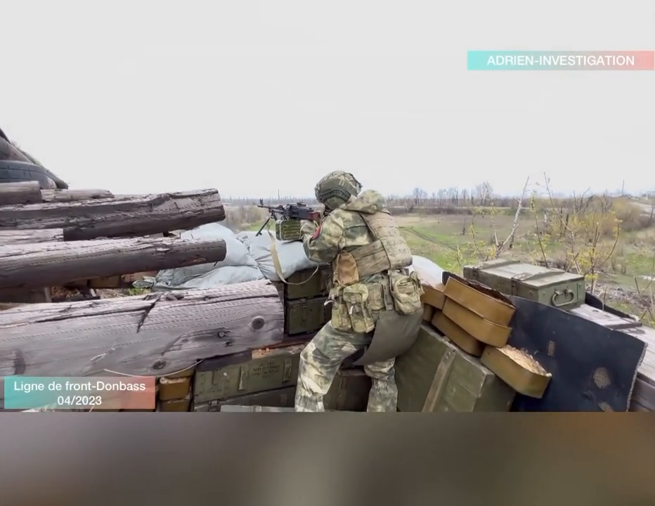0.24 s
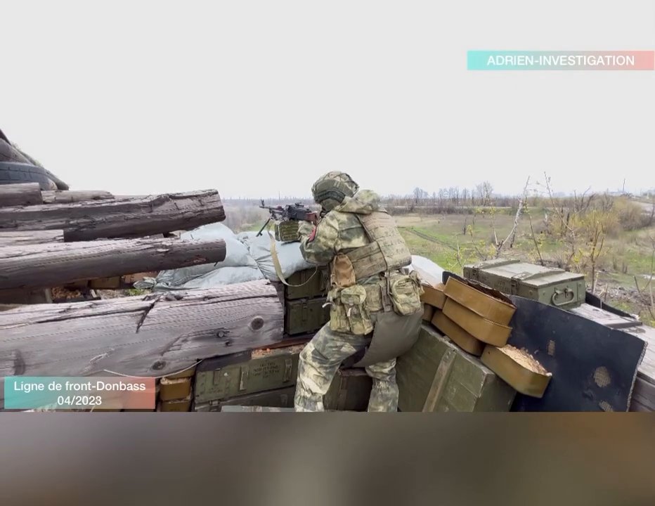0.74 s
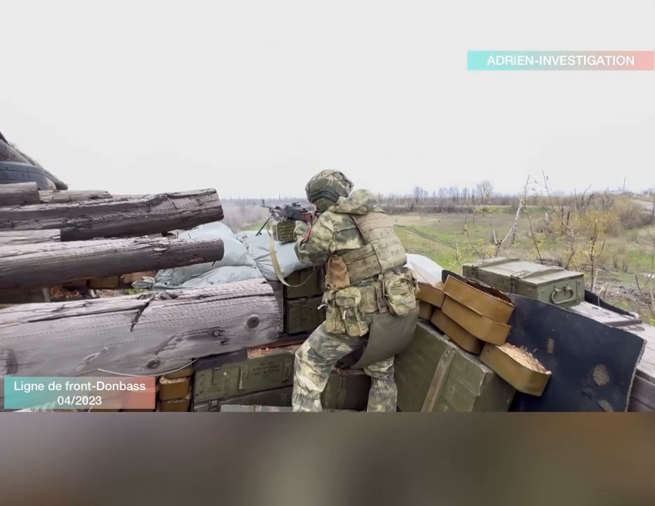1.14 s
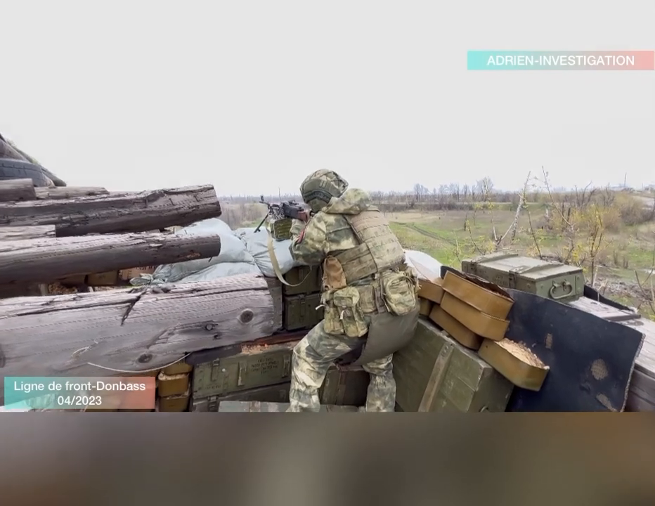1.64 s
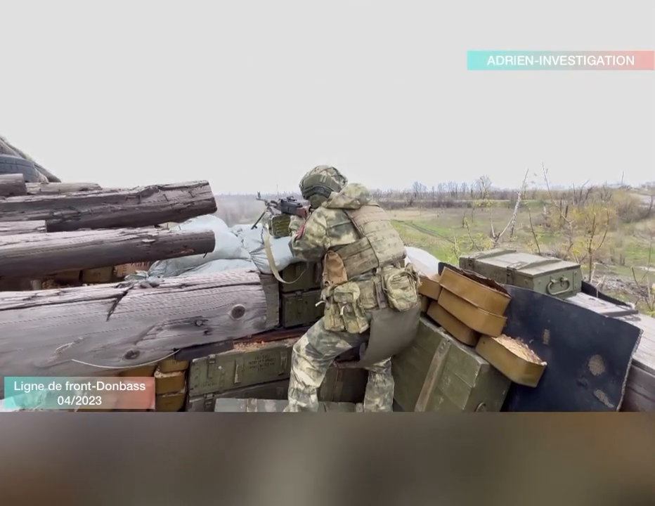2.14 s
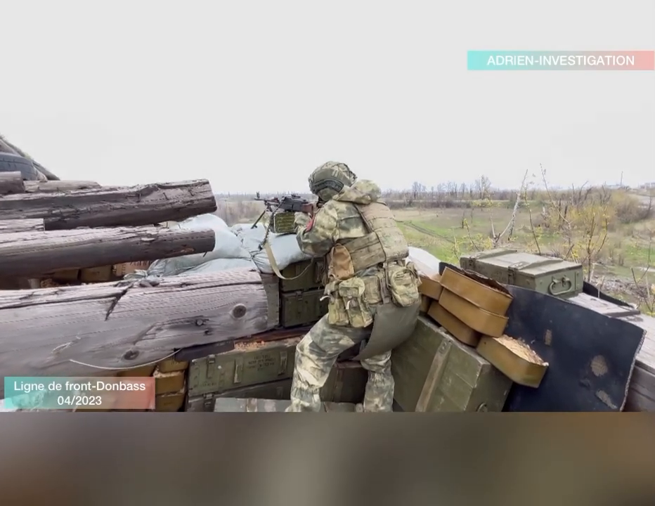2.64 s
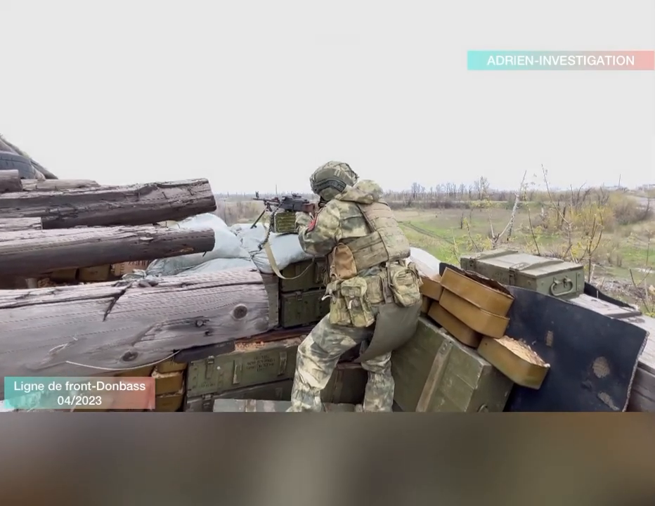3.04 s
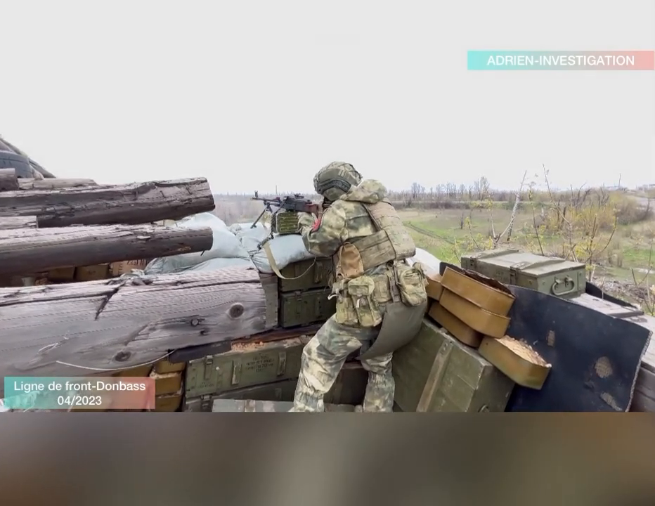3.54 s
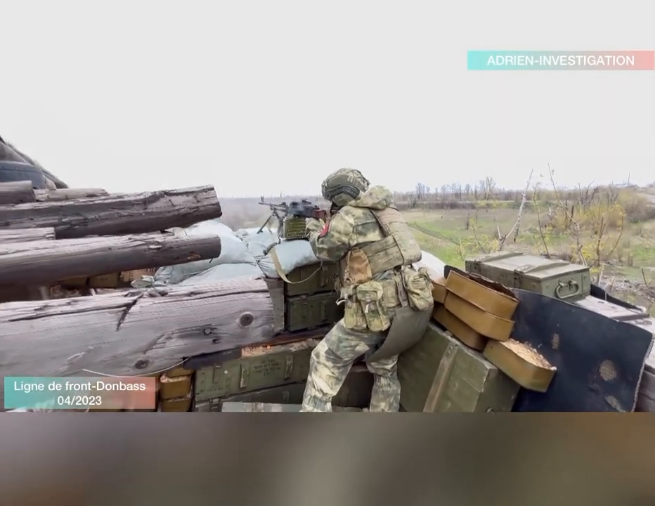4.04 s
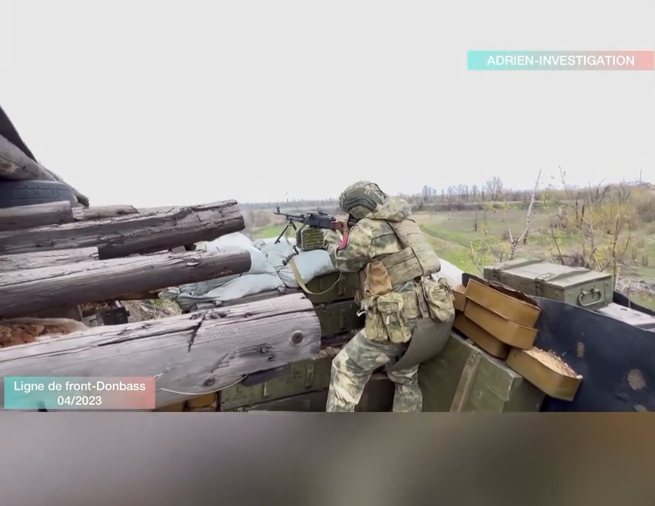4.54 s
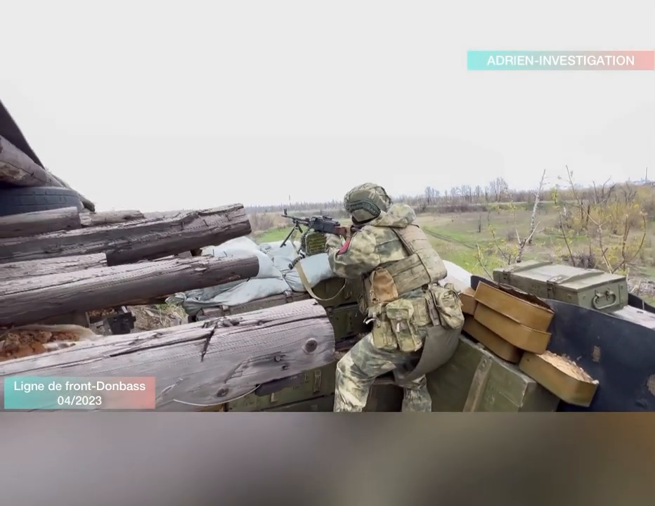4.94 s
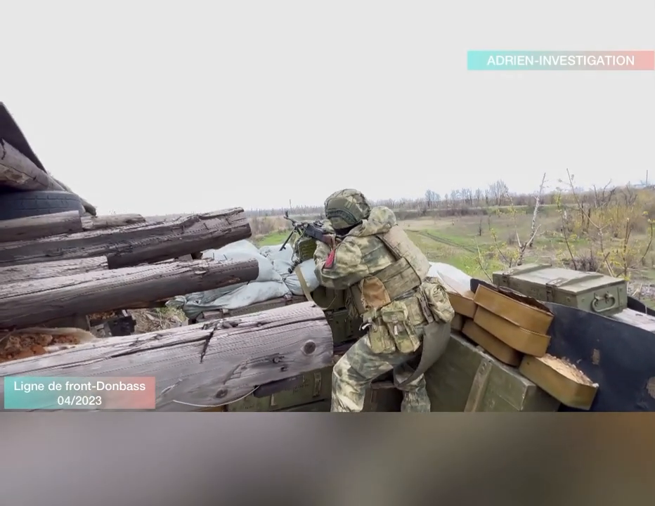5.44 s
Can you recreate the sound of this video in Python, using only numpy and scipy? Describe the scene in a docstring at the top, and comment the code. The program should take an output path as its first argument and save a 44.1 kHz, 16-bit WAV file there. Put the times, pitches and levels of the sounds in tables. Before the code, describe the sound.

A belt-fed machine gun fires five short bursts of two or three rounds, roughly a second apart, from a pit of logs and ammunition boxes. Each shot is a sharp crack with a hollow boom and a low thud, mixed with the clack of the bolt. Echoes fade across open fields, and loose links clink faintly in the pauses. Light wind buffets the nearby microphone throughout.

```python
"""A belt-fed machine gun fires five short bursts from a pit of logs and ammunition boxes in open country.
Each blast is a burst of noise that cracks, a set of ringing tones that booms in the pit, and a late low thud.
Short puffs of metallic noise make the bolt clack and loose links clink.
Fading, patchy noise echoes from the fields and a far tree line.
Filtered noise makes the gusts and eddies that buffet the microphone, over a light breeze and a faint hiss."""
import sys
import numpy as np
from scipy import signal
from scipy.fft import rfft, irfft, next_fast_len
from scipy.io import wavfile
from scipy.ndimage import uniform_filter1d

SR = 44100
rng = np.random.default_rng(int(sys.argv[2]) if len(sys.argv) > 2 else 0)


def wav_record(signal):
    """Record a signal, one row per channel, as 16-bit PCM in the file named by sys.argv[1]."""
    frames = np.transpose(np.atleast_2d(signal))
    bounded = np.clip(frames, -1, 1)
    # unit amplitude maps onto the largest positive 16-bit level
    quanta = np.round(bounded * 32767).astype(np.int16)
    wavfile.write(sys.argv[1], SR, quanta)


N = 250487
TIME = np.arange(N) / SR  # seconds


def undb(db):
    """Turn decibels into a gain."""
    return 10 ** (np.asarray(db) / 20)


def tint(x, colour):
    """Colour a sound by a curve of (frequency [Hz], level [dB]) points."""
    hz, db = np.transpose(colour)
    size = next_fast_len(x.shape[-1])
    f = np.fft.rfftfreq(size, 1 / SR)
    gain = undb(np.interp(np.log(f + 1), np.log(hz), db))
    return irfft(rfft(x, size) * gain, size)[..., :x.shape[-1]]


def resonate(x, hz, width):
    """Let one resonance ring, with gain 1 at its centre."""
    return signal.lfilter(*signal.iirpeak(hz, hz / width, SR), x)


def envelope(hold_s, fade_s, size=8192):
    """A sudden start, a plateau and an exponential fade, scaled to unit energy."""
    shape = np.exp(-np.maximum(TIME[:size] - hold_s, 0) / fade_s)
    return shape / np.linalg.norm(shape)


def puff(colour, shape):
    """Coloured noise under an envelope, unrelated left and right."""
    return tint(rng.standard_normal((2, len(shape))), colour) * shape


def scatter(shape, count=6):
    """Dense reflections that spread a pulse over an envelope and hardly favour any frequency."""
    x = rng.standard_normal(len(shape)) * shape
    for _ in range(count):
        x = irfft(np.exp(1j * np.angle(rfft(x))))  # make all frequencies equally strong
        power = np.abs(uniform_filter1d(x ** 2, size=128))
        x = x * shape / np.sqrt(power + 1e-18)  # return to the envelope
    return x


def delay(x, s):
    """The same sound, s seconds later."""
    i = max(int(s * SR), 0)
    silence = np.zeros(x.shape[:-1] + (i,))
    return np.concatenate([silence, x[..., :x.shape[-1] - i]], axis=-1)


def blend(usual, fresh, change):
    """Mix a steady part and a changing part at constant power."""
    return (usual + change * fresh) / np.hypot(1, change)


def add(out, s, x):
    """Mix x into out at time s."""
    i = int(round(s * SR))
    out[:, i:i + x.shape[-1]] += x[..., :N - i]


def sides(pan_db):
    """Left and right gains; a positive pan_db makes the left louder by that much."""
    return undb(np.array([[pan_db], [-pan_db]]) / 2)


def walk(rate):
    """A smooth random wander with a spread near 1; rate is new values per second."""
    k = int(SR / rate)
    steps = rng.standard_normal(4096)[np.arange(N) // k]
    return 1.7 * uniform_filter1d(uniform_filter1d(steps, k), k)


# Rounds fired, about 12 a second within a burst: (time [s], relative boom level [dB], relative crack level [dB])
ROUNDS = [(0.3218, -2.7, -0.9), (0.408, -2, -2.3), (0.4923, -1.7, -1.3), (1.0047, -0.5, -0.6),
          (1.09, -2.3, -3.6), (1.7944, -0.2, -0.3), (1.879, -1.6, 0.5), (1.9603, -1.0, -1.7),
          (3.1459, 0, -0.2), (3.2283, -1, -0.5), (3.313, 0, -1.6), (3.9554, -1.3, -2), (4.0395, -0.2, 0.1),
          (4.1235, 0, -0.6)]
# Splinters of the blast off logs and boxes: (frequency [Hz], relative level [dB])
SPLASH_COLOUR = [(25, -12), (70, 8), (140, 9), (250, 18), (330, 17), (450, 7), (1000, 3), (1700, 4),
                 (2700, -3), (5000, 0), (8700, -1), (10200, -3), (12000, -10), (15500, -11)]


def blasts(boom_db=38.6, crack_db=18.5, splash_db=8.5, boom_change=.75, crack_change=1.0, escape_s=.065):
    """Each round cracks, splashes and booms; part of its boom and crack is shared, the rest is new each time."""
    out, ring, walls = np.zeros((2, N)), pit_ring(), bounces()
    front = rng.standard_normal(ring.shape)
    age = TIME[:ring.shape[1]]
    for s, round_boom_db, round_crack_db in ROUNDS:
        round_walls = blend(walls, bounces(), boom_change)
        boom = signal.fftconvolve(ring, round_walls, axes=1)[:, :len(age)]
        boom = boom / (1 + (age / escape_s) ** 4)  # after a few crossings the sound escapes to the sky
        # turbulent muzzle gas changes the crack
        snap = crack(blend(front, rng.standard_normal(front.shape), crack_change))
        splash = puff(SPLASH_COLOUR, envelope(hold_s=.005, fade_s=.024)) * sides(pan_db=5)
        sharp = undb(crack_db) * snap + undb(splash_db) * splash
        add(out, s, undb(round_crack_db) * sharp)
        add(out, s, undb(boom_db + round_boom_db) * boom)
    return out


# Muzzle crack: (frequency [Hz], relative level [dB])
CRACK_COLOUR = [(30, -20), (300, -4), (900, 1), (1700, 4), (2500, -.5), (3300, 1), (4500, 0.5), (7000, 0),
                (8800, 3.5), (10000, -6.5), (11200, -12), (12200, -20), (15500, -19)]
# How much weaker the crack is on the right: (frequency [Hz], level change [dB])
RIGHT_SHADE = [(200, -11), (1000, -7.5), (1700, -8), (3000, -10), (6000, -11.5), (8600, -12.5), (9800, -2),
               (11000, -3), (13000, -5)]


def crack(noise, shock_s=.0009, ragged_db=2.5):
    """A shock front, then a ragged cluster of reflections off the nearest logs; the right port lies in shade."""
    noise = tint(noise, CRACK_COLOUR)
    noise[1] = tint(noise[1], RIGHT_SHADE)
    ragged = undb(ragged_db * np.repeat(rng.standard_normal((2, 512)), 16, axis=1))
    shock = 1 + np.exp(-TIME[:8192] / shock_s)
    shape = envelope(hold_s=.0055, fade_s=.003) * shock * ragged
    return noise * shape / np.linalg.norm(shape, axis=1, keepdims=True)


# Resonances of the pit: (frequency [Hz], width [Hz], relative left level [dB], relative right level [dB])
PIT_TONES = [(67.0, 8.9, -17.5, -18), (116.0, 110.0, -34, -9.5), (142, 22, 2, -7), (221.0, 23.0, -5.5, -12),
             (273, 25, -2.5, -11.5), (331.0, 84, -4.5, -12.5), (386.0, 17, -15.5, -27), (451, 30, 0, -15),
             (499, 19, -4, -12.5), (588, 36, 0.5, -11), (667, 60.0, -10, -13.5), (703, 23.0, -5.5, -18),
             (750, 42, -1.5, -16), (846, 39, -26, -15), (910, 21, -18, -12), (1055, 46, -3.5, -18),
             (1128, 24, -2, -29.5), (1257, 12, -23.5, -20.5), (1316, 11, -26, -13), (1460, 59, -29, -31.5),
             (1588, 120, -10, -12.5), (1627, 17, -15, -20.5), (1760, 24, -13, -22.5),
             (1910.0, 22.0, -15, -27.5), (2122.0, 64.0, -21.5, -33)]


def pit_ring(bloom_s=.005, bloom_hz=700, size=8192):
    """The pit's answer to one pulse; low resonances span the whole pit and build up later."""
    # a blast carries no steady pressure, so the lowest part is weakened
    high_pass = signal.butter(1, 140, "high", fs=SR, output="sos")
    pulse = signal.sosfilt(high_pass, signal.unit_impulse(size))
    ring = np.zeros((2, size))
    for hz, width, left_db, right_db in PIT_TONES:
        late_s = bloom_s / (1 + (hz / bloom_hz) ** 2)
        ring += undb([[left_db], [right_db]]) * delay(resonate(pulse, hz, width), late_s)
    return ring


def bounces(lag_s=.0006, own=1.1):
    """The blast bounces between the walls; it reaches the right port a little later, with bounces of its own."""
    left = scatter(envelope(hold_s=.008, fade_s=.0085))
    right = blend(delay(left, lag_s), scatter(envelope(hold_s=.006, fade_s=.011)), own)
    return np.array([left, right])


# Low thud that follows each blast out of the pit: (frequency [Hz], relative level [dB])
THUD_COLOUR = [(20, -26), (45, -5), (85, 0), (130, -7), (300, -22), (1000, -60)]


def thuds(thud_db=20, late_s=.02, swell_s=.022):
    """The lowest part of each blast swells late and outlasts the crack."""
    out, age = np.zeros((2, N)), TIME[:8192] / swell_s
    shape = age * np.exp(-age)
    shape = shape / np.linalg.norm(shape)
    for s, boom_db, _ in ROUNDS:
        add(out, s + late_s, undb(thud_db + boom_db) * puff(THUD_COLOUR, shape))
    return out * sides(pan_db=2)


# Steel of the action and belt: (frequency [Hz], relative level [dB])
STEEL_COLOUR = [(200, -12.5), (1000, 5), (2000, -0.5), (4000, -3.5), (6500, -0.5), (9500, -3),
                (12000, -15.5), (15500, -7.5)]


def action(run_s=.082, strip_s=.052, recoil_s=.026, catch_s=.067):
    """The open bolt runs forward, strips a round and locks; gas throws it back, and the sear ends the burst."""
    out, times = np.zeros((2, N)), np.array(ROUNDS)[:, 0]
    pause = np.diff(np.r_[-1, times, TIME[-1]]) > .2  # gaps between bursts
    closing = envelope(hold_s=.001, fade_s=.007)[::-1]  # the scrape swells as the bolt speeds up
    scrape_colour = [(150, -8), (1200, 0), (6000, 1), (9000, -4), (15500, -11)]
    for s, first, last in zip(times, pause, pause[1:]):
        if first:
            run_shape = envelope(hold_s=.054, fade_s=.01) * np.minimum(TIME[:8192] / .012, 1)
            add(out, s - run_s, undb(-11) * puff(STEEL_COLOUR, run_shape))
            strip = puff(STEEL_COLOUR, envelope(hold_s=.002, fade_s=.0058))
            add(out, s - strip_s, undb(-10.5) * strip)
        add(out, s - len(closing) / SR, undb(-1.5) * puff(scrape_colour, closing))
        recoil = puff(STEEL_COLOUR, envelope(hold_s=.005, fade_s=.005))
        add(out, s + recoil_s, undb(1.5) * recoil)
        if last:
            catch = puff(STEEL_COLOUR, envelope(hold_s=.00082, fade_s=.0027))
            add(out, s + catch_s, undb(-12) * catch)
    return out * sides(pan_db=5)


# Clinks of loose links and cases: (time [s], relative level [dB])
CLINK_TIMES = [(2.2646, -63.5), (2.342, -71), (2.365, -67), (2.737, -76.5), (4.6091, -81), (4.7914, -84),
               (5.2925, -74), (5.4176, -76.5)]


def clinks(clink_db=27):
    """Links and spent cases touch each other, each time with a tiny puff of bright noise."""
    out = np.zeros((2, N))
    colour = [(1000, -12), (4000, -3), (8700, 0), (11000, -9), (15500, -14)]
    for s, db in CLINK_TIMES:
        clink = puff(colour, envelope(hold_s=.00044, fade_s=.006))
        add(out, s, undb(db + clink_db) * clink)
    return out


# Echo of the fields: (frequency [Hz], relative level [dB])
FIELD_COLOUR = [(50, 7.5), (200, 11), (500, 8), (1000, 1), (2000, 1.5), (3500, -7), (6000, -6),
                (9000, -8.5), (11500, -24.5), (15500, -26.5)]
# Echo of the far tree line: (frequency [Hz], relative level [dB])
TREE_COLOUR = [(100, -5), (500, -3), (1200, 0), (2200, 1), (3200, -9), (5000, -14), (9000, -26),
               (15500, -45)]
# Rounds of an earlier burst that still echo: time before the start, negative [s]
EARLIER_ROUNDS = [-.86, -.78, -.69]


def fields(air_db_per_hz=.0021, patchy_db=1.8, trees_db=-58, trees_s=1.11, trees_width_s=.12):
    """Ground and scrub return each blast in patches, duller with distance; far trees answer from the right."""
    hz, s, grains = signal.stft(rng.standard_normal((2, N)), SR, nperseg=256)
    # every second of travel through the air takes more of the treble
    air_loss = undb(-air_db_per_hz * hz[:, None] * s)
    scrub = signal.istft(grains * air_loss, SR)[1][:, :N]
    scrub = tint(scrub, FIELD_COLOUR) * roll()
    trees_shape = undb(trees_db) / np.hypot(1, (TIME - trees_s) / trees_width_s)
    trees = puff(TREE_COLOUR, trees_shape) * sides(pan_db=-5)
    trees = trees * np.exp(-(TIME / 1.9) ** 4)  # fade out the long tail
    echo = (scrub + trees) * undb(patchy_db * walk(130))
    out = np.zeros((2, N))
    for s, _, _ in ROUNDS:
        add(out, s, echo)
    for s in EARLIER_ROUNDS:
        add(out, 0, echo[:, int(-s * SR):])
    return out


def roll(echo_db=-41, rise_s=.015, spread_s=.45, loss_db_per_s=12.5):
    """One round's echo builds up, spreads out over the fields and is soaked up by the ground."""
    rise = 1 - np.exp(-TIME / rise_s)
    return rise * undb(echo_db - loss_db_per_s * TIME) / (1 + TIME / spread_s)


# Single eddies that slap the microphone:
# (time [s], relative level [dB], pitch [Hz], rasp at 900 Hz relative to the pitch [dB])
EDDIES = [(0.045, -42, 90, -20), (0.18, -37, 130, -15), (2.527, -40, 275, -15), (2.548, -37, 100, -32),
          (2.582, -44, 151, -26), (2.633, -42, 180, -20), (2.683, -39, 198, -16), (2.874, -36, 100, -34),
          (3.588, -37, 70, -34), (3.828, -42, 249, -17), (5.279, -44, 318, -17)]


def buffets(buffet_db=-1, swell_s=.006):
    """An eddy swells and dies in a few cycles, with a little rasp."""
    out, age = np.zeros((2, N)), TIME[:4096] / swell_s
    for s, db, hz, rasp_db in EDDIES:
        colour = [(25, -24), (hz, 0), (900, rasp_db), (2500, rasp_db - 26), (8000, -85)]
        eddy = puff(colour, age * np.exp(1 - age))
        loudness = np.sqrt(np.mean(eddy[:, age < 3] ** 2))
        add(out, s, undb(db + buffet_db) * eddy / loudness)
    return out


# Gusts on the microphone: (start [s], length before dying away [s], level [dB], extra rumble [dB])
GUST_TIMES = [(-0.01, .26, -47, 2), (0.58, .44, -53, 6), (1.0, .28, -49, 2), (1.31, .04, -50, 5),
              (1.555, .04, -57, 9), (1.71, .06, -50, 3), (2.03, .17, -42.5, 3), (2.22, .16, -49, 3),
              (2.44, .3, -41.5, 1), (2.76, .2, -46, 4), (2.97, .06, -55, 4), (3.12, .3, -44, 0),
              (3.46, .15, -38.5, -1), (3.79, .07, -45, 2), (4.26, .17, -53, 1), (4.48, .12, -48, -2),
              (4.775, .03, -52, -2), (4.91, .04, -56, 8), (5.02, .07, -59, 5), (5.11, .25, -50.5, 4),
              (5.50, .18, -49, -4)]
# Wind noise before its band filter: (frequency [Hz], relative level [dB])
WIND_COLOUR = [(15, -42.5), (25, -14.5), (54, 1.5), (117, 0), (278, -4), (649, -18.5), (757, -25),
               (1600, -25), (1770, -29.5), (1950, -28), (2500, -32.5), (3250, -69.5), (5500, -120)]
# Faint hiss of the open air: (frequency [Hz], relative level [dB])
HISS_COLOUR = [(100, 0), (1500, -2), (3000, -8), (6000, -13), (9500, -16), (12000, -26), (15500, -30)]


def wind(breeze_db=-63, sway_db=2.5, breeze_rumble_db=4, rumble_hz=120, flutter_db=2.2, hiss_db=-76):
    """Turbulence at each port: a light breeze and fluttering gusts, each with its own rumble, over a faint hiss."""
    air = tint(rng.standard_normal((2, N)), WIND_COLOUR)
    air = signal.sosfilt(signal.butter(2, [42, 1100], "band", fs=SR, output="sos"), air)
    air = air / air.std()
    rumble = signal.sosfiltfilt(signal.butter(2, rumble_hz, fs=SR, output="sos"), air)
    # rush is the strength above the rumble, push is the strength of the rumble
    rush = undb(breeze_db + sway_db * walk(6))
    push = rush * undb(breeze_rumble_db)
    for start_s, length_s, db, rumble_db in GUST_TIMES:
        force = undb(db) * gust(start_s, length_s)
        rush = np.hypot(rush, force)
        push = np.hypot(push, force * undb(rumble_db))
    flutter = undb(flutter_db * np.array([walk(60), walk(60)]))
    gusty = (rush * (air - rumble) + push * rumble) * flutter * sides(pan_db=3)
    return gusty + puff(HISS_COLOUR, np.full(N, undb(hiss_db)))


def gust(start_s, length_s, attack_s=.02, release_s=.022):
    """A gust rises, holds and dies away."""
    age = TIME - start_s
    return np.clip(age / attack_s, 0, 1) * np.exp(-np.maximum(age - length_s, 0) / release_s)


def scene():
    """The gun, its echo and the wind."""
    return blasts() + thuds() + action() + clinks() + fields() + buffets() + wind()


# Dips of the microphone ports: (frequency [Hz], width [Hz], depth [0 to 1])
NOTCHES = [(5350, 110, 0.9), (7650, 560, 0.9)]


def record(dry, ceiling=.95, top_hz=15800):
    """The loudest peaks are rounded, the ports notch the treble, the very top narrows to the centre and is cut."""
    x = ceiling * np.tanh(dry / ceiling)
    for hz, width, depth in NOTCHES:
        x = x - depth * resonate(x, hz, width)
    side = tint((x[0] - x[1]) / 2, [(10000, 0), (11500, -7)])
    x = x.mean(axis=0) + np.array([side, -side])
    return signal.sosfilt(signal.ellip(8, .2, 70, top_hz, fs=SR, output="sos"), x)


dry = scene()
out = record(dry)
wav_record(out)
```